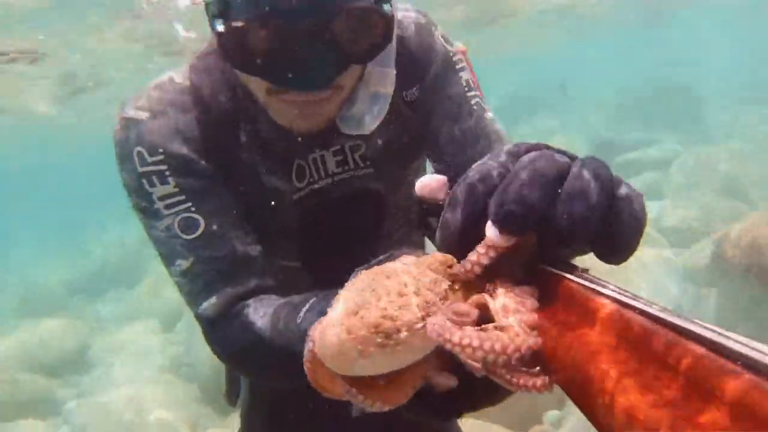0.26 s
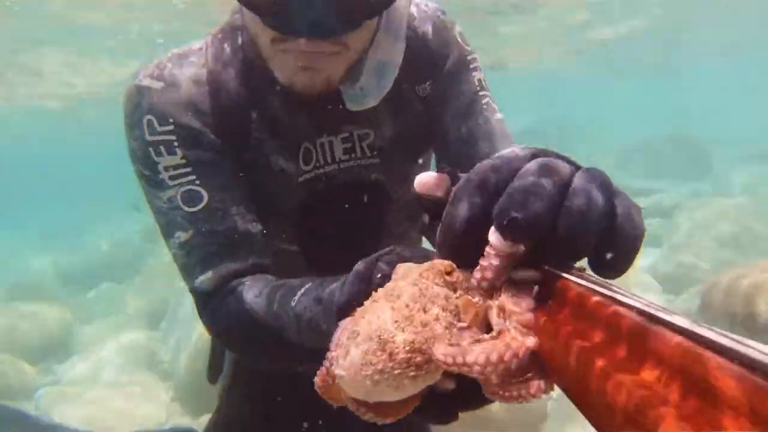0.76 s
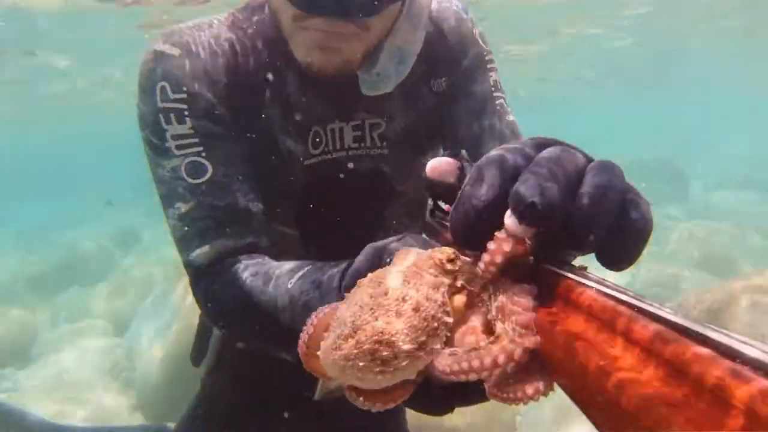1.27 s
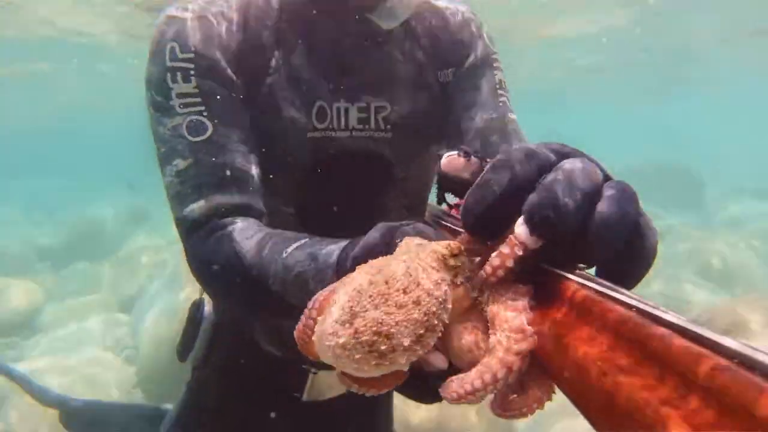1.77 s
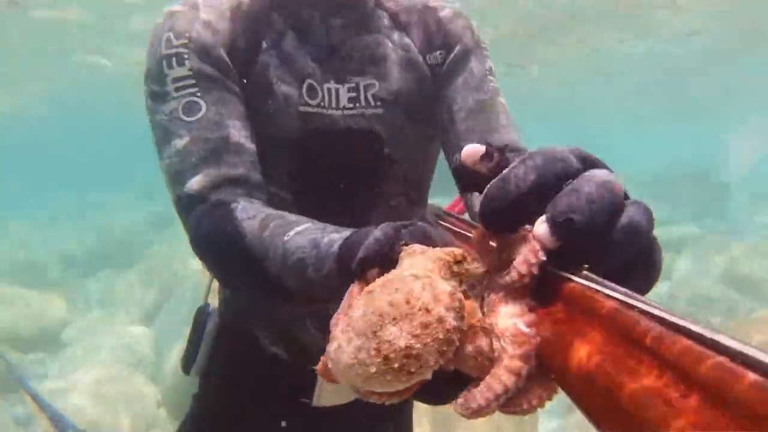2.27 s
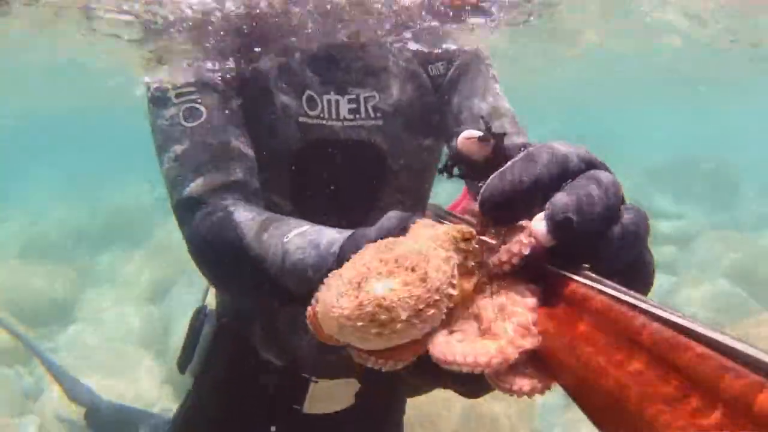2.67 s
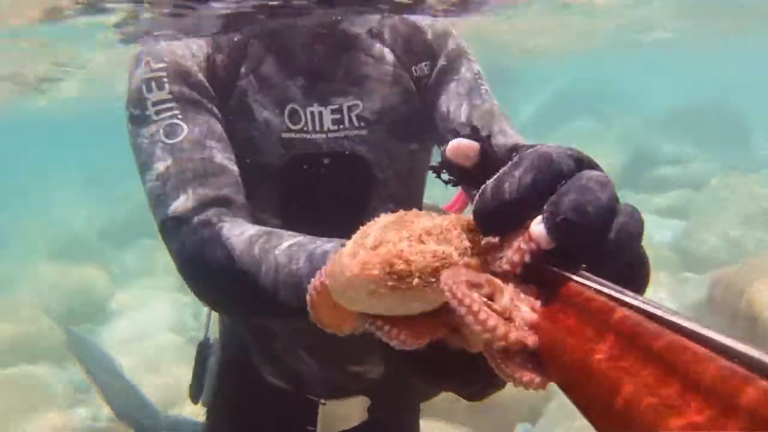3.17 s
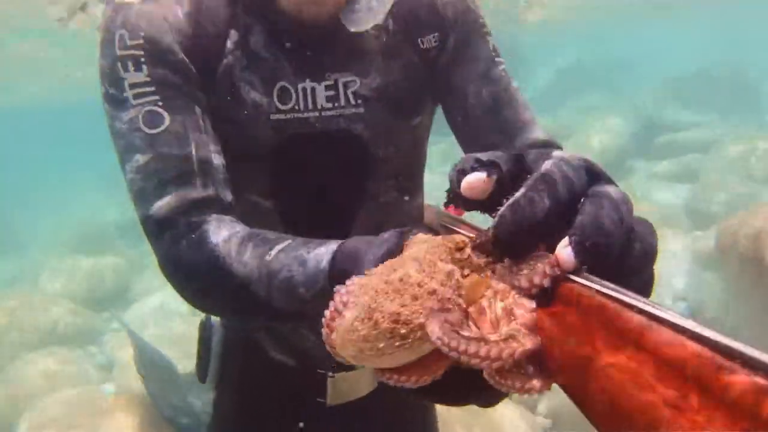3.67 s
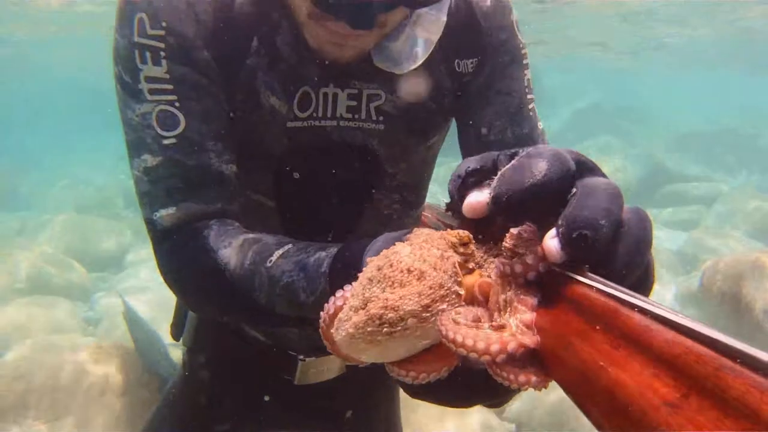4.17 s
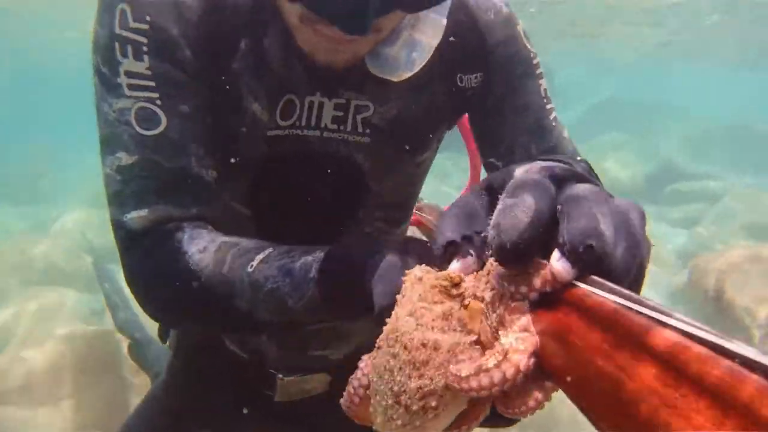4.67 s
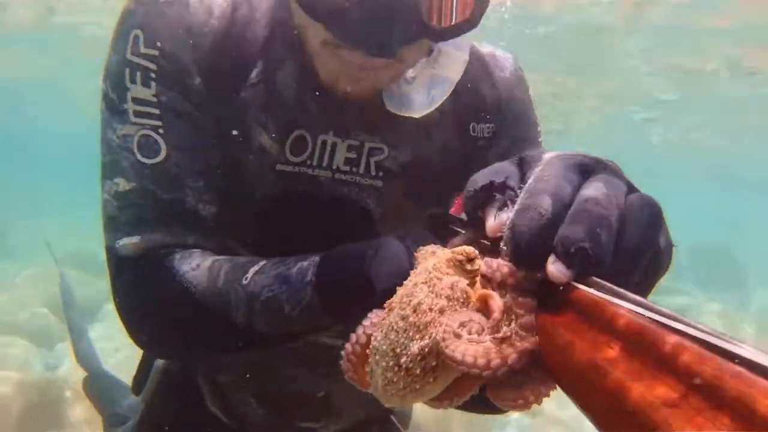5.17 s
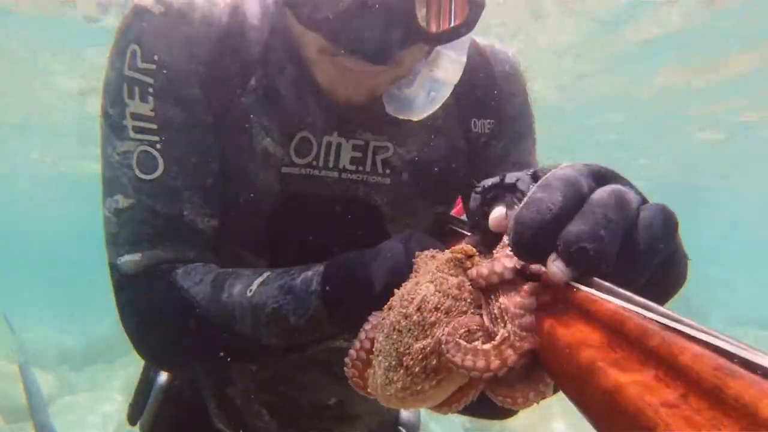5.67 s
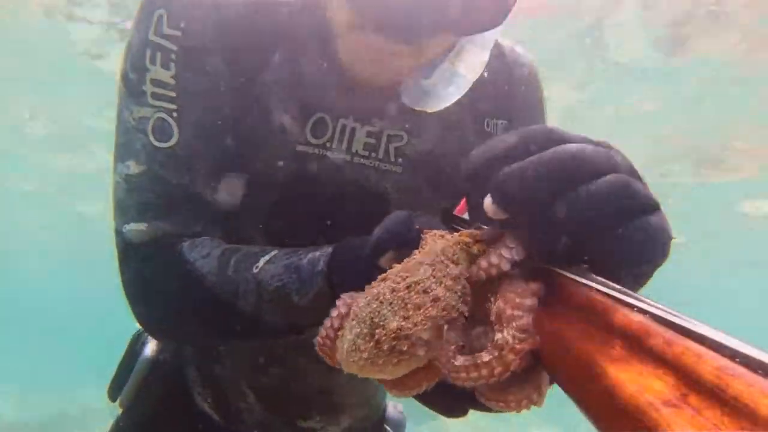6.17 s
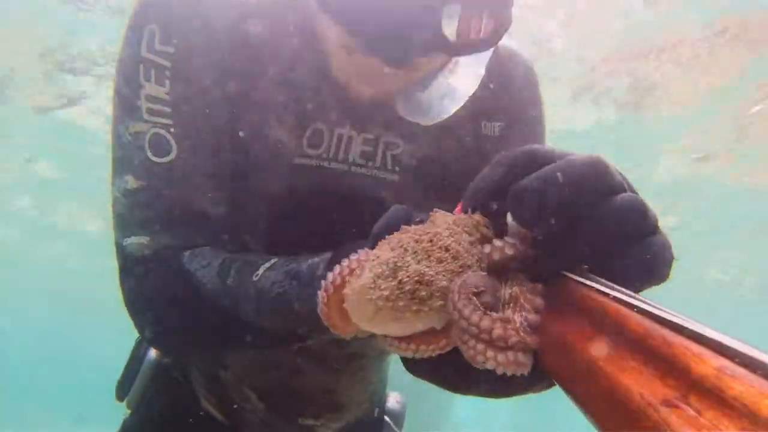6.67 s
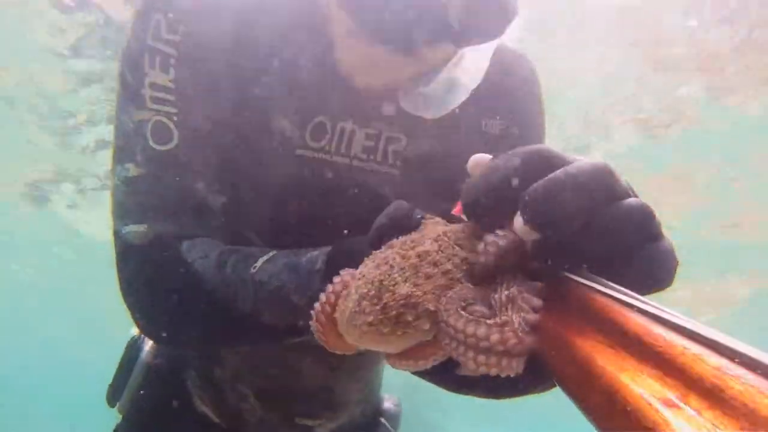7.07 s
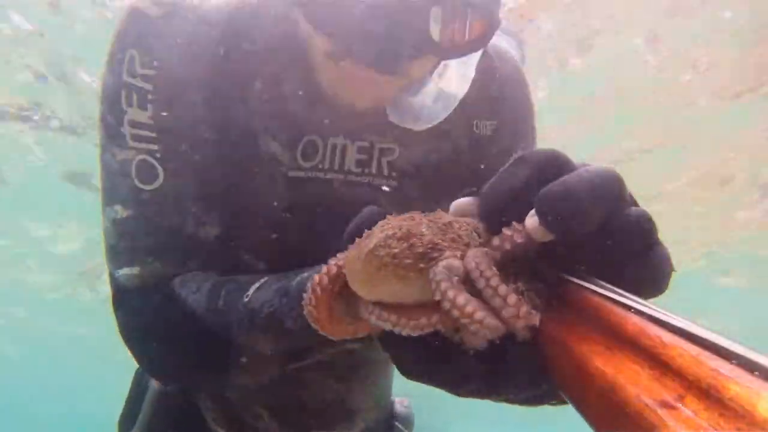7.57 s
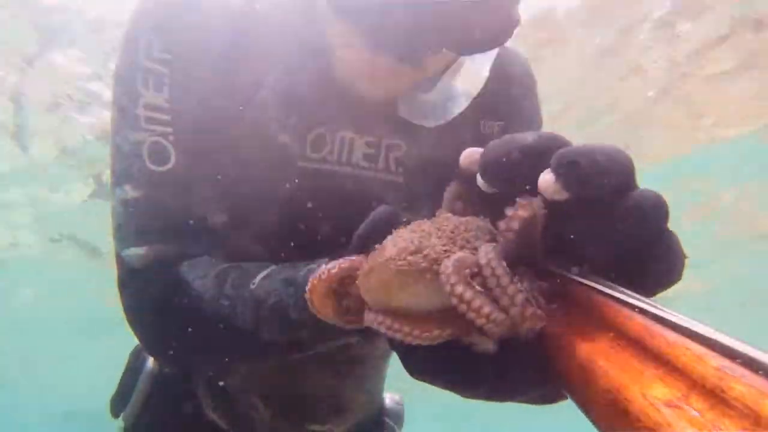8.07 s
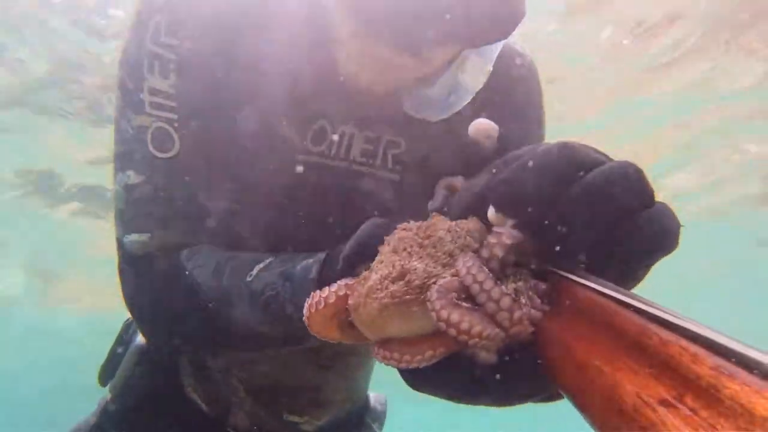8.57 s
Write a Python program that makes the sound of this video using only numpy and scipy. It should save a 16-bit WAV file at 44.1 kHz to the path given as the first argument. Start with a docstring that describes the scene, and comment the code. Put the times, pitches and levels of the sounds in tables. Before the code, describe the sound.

A diver with gloved hands holds an octopus and a wooden speargun underwater. The sealed camera mounted on the gun picks up close, hollow knocks, sharp clicks and short rubs, sparse at first, then denser and loudest around the middle, easing later. Beneath lie soft microphone hiss, faint low slosh and occasional tiny bubble ticks. Centred, dry and boxy.

```python
"""Speargun handled under water

A camera in a sealed housing sits on a wooden speargun that a diver handles. Knocks, snaps and rubs
drive decaying sine modes: the housing rings near 550 Hz, the barrel thuds, the mount sways low.
Coloured noise makes the slosh and the soft microphone hiss; bubbles tick as short rising sines."""
import sys
import numpy as np
from scipy import signal
from scipy.fft import rfft, irfft, next_fast_len
from scipy.io import wavfile
from scipy.ndimage import map_coordinates

SR = 44100
rng = np.random.default_rng(int(sys.argv[2]) if len(sys.argv) > 2 else 0)


def bounce(signal):
    """Save signal as a 16-bit WAV file at the path given by the first command-line argument."""
    frames = np.transpose(np.atleast_2d(signal))
    limited = np.clip(frames, -1, 1)
    pcm = np.round(limited * 32767).astype(np.int16)
    wavfile.write(sys.argv[1], SR, pcm)


N = 389844


def amp(db):
    """Decibels to gain."""
    return 10 ** (np.asarray(db) / 20)


def unit(x):
    """Scaled to rms 1."""
    return x / np.sqrt(np.mean(x ** 2) + 1e-20)


def along(points, at):
    """Straight lines through (place, value) points."""
    return np.interp(at, *np.transpose(points))


def add(track, start_s, sound):
    """Mixes a sound in at a time."""
    part = track[max(round(start_s * SR), 0):][:len(sound)]
    part += sound[:len(part)]


def filtered(x, response):
    """x with its spectrum multiplied by a response of frequency."""
    size = next_fast_len(N + 8192)
    spectrum = rfft(x, size) * response(np.fft.rfftfreq(size, 1 / SR))
    return irfft(spectrum, size)[..., :N]


def ringing(modes, scatter_db=0, detune=0, size=SR // 5):
    """Answer of modes to one tap: decaying sines that swell over a cycle, level and pitch scattered."""
    t = np.arange(size) / SR
    hz, db, t60_s = np.transpose(modes)[:, :, None]
    level, pitch = rng.standard_normal((2, len(modes), 1))
    hz = hz * (1 + detune * pitch)
    swell = (1 - np.exp(-2.5 * hz * t)) ** 2
    decay = amp(db + scatter_db * level - 60 * t / t60_s)
    return np.sum(decay * swell * np.sin(2 * np.pi * hz * t), axis=0)


def driven(force, modes):
    """A force played through modes, rms 1."""
    return unit(signal.fftconvolve(force, ringing(modes, size=SR // 2))[:N])


def gravel(rate_hz, spread_db):
    """Sparse random slips of uneven size and either sign."""
    hits = rng.random(N) < rate_hz / SR
    signs = rng.choice([-1, 1], N)
    return hits * signs * amp(spread_db * rng.standard_normal(N))


def clumps(rate_hz, depth_db):
    """Smooth random gain through knots at a given rate, swells capped."""
    knots = np.minimum(rng.standard_normal(int(N * rate_hz / SR) + 4), 1.6)
    return amp(depth_db * map_coordinates(knots, [np.arange(N) * rate_hz / SR]))


# microphone noise colour: f/Hz, relative density/dB
HISS_COLOUR = [(20, 5), (300, 4), (1000, 6), (2500, 3), (5000, 0), (14500, -3), (16000, -1)]


def hiss(level_db, side_db):
    """Coloured noise: a shared microphone hiss heard in the centre, and a faint opposite-signed noise that
    makes the two channels differ."""
    points = [(np.log(hz), db) for hz, db in HISS_COLOUR]

    def colour(hz):
        return amp(along(points, np.log(hz + 1)))

    shared, side = amp(level_db) * unit(filtered(rng.standard_normal((2, N)), colour))
    return shared + amp(side_db) * np.outer([1, -1], side)  # channels differ by a faint opposite-signed noise


# water moving round the housing: f/Hz, relative density/dB
SLOSH_COLOUR = [(12, -13.5), (28, 0.5), (60, -6), (100, -13), (200, -46)]
SLOSH_RMS_DB = -67.5


def slosh():
    """Moving water: low-coloured noise, broken up by a random gain."""
    stir = rng.standard_normal(N) * clumps(rate_hz=15, depth_db=4.0)
    return amp(SLOSH_RMS_DB) * unit(filtered(stir, lambda hz: amp(along(SLOSH_COLOUR, hz))))


# modes of the camera on its mount: f/Hz, level/dB, t60/s
MOUNT_MODES = [(44.36, 1, 0.3), (66, 3, 0.1), (110, -10.5, 0.1)]
# jolts that set the mount swinging: t/s, drive level/dB
JOLTS = [(0.301, -49), (0.615, -55), (0.689, -56), (0.92, -46), (1.322, -45), (1.41, -48), (1.68, -41),
         (1.81, -52), (1.974, -44.5), (2.05, -54), (2.309, -54), (2.447, -46), (2.574, -44), (2.781, -42),
         (2.933, -39), (3.028, -32), (3.226, -36.5), (3.483, -44), (3.703, -35), (3.796, -29.5),
         (4.081, -46.5), (4.228, -37.5), (4.631, -37), (4.772, -47), (5.128, -33.5), (5.232, -28),
         (5.307, -38.5), (5.396, -46), (5.505, -30), (5.63, -44), (5.746, -44), (5.901, -42.5), (6.03, -44),
         (6.342, -46), (6.397, -41), (6.511, -43), (6.825, -50), (7.009, -49), (7.259, -40), (7.643, -44.5),
         (7.71, -45), (7.829, -36), (7.961, -39), (8.06, -44), (8.499, -39.5), (8.588, -31.5)]


def sway():
    """The camera rocks on its mount: jolts start slow swings over a faint stirring by the water."""
    stir = rng.standard_normal(N) * clumps(rate_hz=3.02, depth_db=4.0)
    out = amp(-70.0) * driven(stir, MOUNT_MODES[:1])
    for s, db in JOLTS:
        swing = ringing(MOUNT_MODES, scatter_db=3.0, detune=0.053, size=SR // 2)
        add(out, s + 0.0024, rng.choice([-1, 1]) * amp(db) * swing)
    return out


# modes of the air in the housing: f/Hz, relative level/dB, t60/s
AIR_MODES = [(551, 9, 0.098), (519.4, -12.5, 0.25)]
# modes of the barrel: f/Hz, relative level/dB, t60/s
BARREL_MODES = [(144, -12, 0.086), (281, 1.5, 0.019), (348, -3.5, 0.082), (392, -2, 0.059)]
# modes of the housing shell: f/Hz, relative level/dB, t60/s
SHELL_MODES = [(847, -9.5, 0.11), (952, 1.5, 0.039), (1178, 19.5, 0.011), (1418, 7, 0.034),
               (1622, 9, 0.025), (1795, -5, 0.05), (2080, -19, 0.011)]
# fidgeting that grows, then eases: t/s, gain/dB
FIDGET_GAIN = [(0.0, -73.5), (0.37, -69.5), (5.59, -58), (8.84, -63.5)]


def fidget():
    """Faint touches in clumps keep the housing humming; sparser, more uneven ones tap the shell."""
    low_air = [(hz * 0.95, db, t60_s) for hz, db, t60_s in AIR_MODES]  # a firmer grip lowers the ring
    slips = gravel(rate_hz=96, spread_db=1.5) * clumps(rate_hz=27, depth_db=6)
    taps = gravel(rate_hz=51, spread_db=9.0) * clumps(rate_hz=3.7, depth_db=3.5)
    hum = driven(slips, AIR_MODES) * clumps(rate_hz=12, depth_db=0.5)
    hum += amp(-3) * driven(slips[::-1], low_air)  # reversed: touches at other times
    hum += amp(-6.5) * driven(slips, BARREL_MODES)
    hum += amp(-11.5) * driven(slips, SHELL_MODES)
    tapped = amp(-18.5) * driven(taps, AIR_MODES) + amp(-10.0) * driven(taps, SHELL_MODES)
    return amp(along(FIDGET_GAIN, np.arange(N) / SR)) * (hum + tapped)


# modes of the housing's small parts: f/Hz, relative level/dB, t60/s
PARTS_MODES = [(1950, -7, 0.013), (2415, -8, 0.016), (2794, -9, 0.022), (3173, -2.5, 0.012),
               (3465, -4.5, 0.0096), (4170, -12, 0.013), (5640, -21.5, 0.013)]
# knocks on the gun: t/s, air ring peak/dB, weight = barrel re ring/dB, hardness = shell re ring/dB
KNOCKS = [(0.119, -47, -3, -7.5), (0.197, -41.5, -36, -7), (0.28, -42, -4.5, -8), (0.3, -56.5, 5, 13),
          (0.345, -46, -24, 6.5), (0.542, -43, -30, -2.5), (0.645, -52.5, 8.5, 0), (0.69, -47.5, 1.5, -4),
          (0.766, -41.5, -33, -4.5), (0.811, -54.5, -23, 5), (0.916, -26.5, -10.5, -13),
          (0.931, -33.5, -3, -5.5), (0.962, -44.5, -21, -4.5), (1.048, -33, -30, -4),
          (1.111, -44.5, -18, -2), (1.186, -34, -25, -3), (1.243, -45.5, -2, -7.5), (1.288, -47, -5.5, 0.5),
          (1.314, -36.5, -7, -4), (1.433, -48, -12, -9.5), (1.471, -37.5, -19, -11), (1.517, -39, -6, 4.5),
          (1.786, -47.5, -23, -2.5), (2.009, -30, -13, -13), (2.191, -40.5, -8.5, -28),
          (2.458, -31.5, -10.5, -5), (2.55, -42, -4, -2.5), (2.578, -41, -8.5, -28),
          (2.679, -45, -26, -1.5), (2.72, -32, -11, -9.5), (2.775, -41, -2.5, -32),
          (2.826, -38.5, -7, -3.5), (2.867, -26, -31, 1.5), (2.975, -38.5, -2, -4),
          (3.035, -35.5, -9, -4.5), (3.081, -50.5, 2, 4), (3.168, -46, -30, -2.5),
          (3.235, -21, -14.5, -1.5), (3.248, -32, 2.5, -11), (3.257, -21.5, -34, -11.5),
          (3.329, -45, -1, 0), (3.412, -36, -9, -5), (3.481, -41.5, -8, 1.5), (3.711, -46, 0, 3),
          (3.762, -37.5, 3.5, 3.5), (3.801, -29, 3.5, 0), (3.8115, -19, -43, -21), (3.829, -23, -5, -14.5),
          (3.897, -40.5, -28, -11), (3.923, -40.5, -5, -13), (4.076, -39, -2.5, -3.5),
          (4.154, -27.5, -3.5, -8.5), (4.187, -29, -19, -10.5), (4.196, -38, -6, -2.5),
          (4.234, -32, -6.5, -15), (4.284, -36, -9, -10.5), (4.367, -23.5, -2.5, -0.5), (4.419, -47, 10, 5),
          (4.552, -40.5, -7, 2.5), (4.649, -31.5, -2.5, -22), (4.66, -31.5, -31, -1), (4.698, -51, 2, 6),
          (4.73, -42.5, -3.5, 0), (4.789, -47, 2.5, -11.5), (5.031, -38, -31, -3), (5.124, -36.5, -23, 1),
          (5.15, -42, -26, -6.5), (5.185, -33, -30, 1.5), (5.237, -21.5, -3, -4.5), (5.247, -12, -33, -4),
          (5.2565, -21, -25, -7.5), (5.289, -29, 1.5, -5), (5.306, -36.5, -3, -2.5), (5.3501, -46, -1, 9),
          (5.401, -38, -1.5, -6), (5.515, -27.5, -1.5, -5), (5.522, -19, -38, -8), (5.716, -40, 1.5, 3.5),
          (5.766, -33, -1.5, -6), (5.838, -36, -3, 3), (5.913, -32, -6, -10), (6.028, -44, -5, -0.5),
          (6.311, -31, -4, -3), (6.329, -38.5, -27, 0.5), (6.341, -48, 0, 2), (6.412, -29, -4.5, -3.5),
          (6.468, -34, -16, -7.5), (6.518, -35.5, -2.5, -9), (6.628, -36.5, -1, -5.5), (6.659, -51, 6, 7),
          (6.679, -33.5, -1.5, -15), (6.779, -53.5, -20, 9), (6.808, -46, -8, 2),
          (6.836, -33.5, -14.5, -16), (6.875, -45.5, -1.5, -13), (6.953, -58.5, 7, 8.5),
          (7.025, -57, 8.5, 11), (7.068, -63, -10, 12), (7.161, -65, 5, 9), (7.209, -53, -4, 4.5),
          (7.246, -40, 0.5, 0), (7.268, -34.5, -11, -10), (7.385, -37.5, -7.5, -7),
          (7.647, -36.5, -4.5, -7), (7.713, -41, -5.5, -4.5), (7.822, -38.5, -20, -8.5),
          (7.838, -26, -10, -13), (7.846, -31.5, -5.5, -2), (7.866, -35.5, -3, -3.5),
          (7.937, -30, -12.5, -37), (7.996, -30.5, -7.5, -8.5), (8.022, -42, 1, 0.5),
          (8.464, -50.5, 2, 8.5), (8.49, -34.5, -5.5, -10), (8.594, -28.5, -5, 0.5),
          (8.643, -41, -12, -7.5)]
MODE_SCATTER_DB = 3.5  # spread of each mode's strength from blow to blow
PARTS_DB, PARTS_DB_PER_HARDNESS_DB = -16, 0.91  # harder blows click the small parts more
RISE_S, RISE_DB_PER_SOFTNESS_DB, SLOWEST_RISE_S = 0.0006, 1.3, 0.00301  # softer blows swell slower
CHATTER_DECAY_S, RATTLE_DECAY_S = 0.006, 0.012  # to 1/e


def knocks():
    """A first blow and short chatter shake air, barrel, shell and small parts; the last two rattle on."""
    out, t = np.zeros(N), np.arange(SR // 16) / SR
    for s, ring_db, weight_db, hardness_db in KNOCKS:
        chatter = 0.048 * rng.standard_normal(len(t)) ** 3 * np.exp(-t / CHATTER_DECAY_S)
        chatter[0] = 1  # the first blow
        contacts = (rng.random(len(t)) < 600 / SR) * rng.standard_normal(len(t))
        rattle = chatter + 0.5 * contacts * np.exp(-t / RATTLE_DECAY_S)

        bodies = np.array([ringing(modes, scatter_db=MODE_SCATTER_DB, detune=0.02)
                           for modes in (AIR_MODES, BARREL_MODES, SHELL_MODES, PARTS_MODES)])
        bodies = signal.fftconvolve(bodies, [chatter, chatter, rattle, rattle], axes=1)
        rise_s = min(RISE_S * amp(-RISE_DB_PER_SOFTNESS_DB * hardness_db), SLOWEST_RISE_S)
        bodies *= 1 - np.exp(-(np.arange(bodies.shape[1]) / SR / rise_s) ** 2)
        bodies /= np.abs(bodies).max(axis=1, keepdims=True)

        parts_db = PARTS_DB + PARTS_DB_PER_HARDNESS_DB * hardness_db
        gains = amp(ring_db + np.array([0, weight_db, hardness_db, parts_db]))
        add(out, s - 0.6 * rise_s, gains @ bodies)
    return out


# low thuds of the barrel, and one deeper boom of the jolted mount: t/s, level/dB, f/Hz
THUDS = [(0.121, -60, 194), (0.771, -55, 198), (1.47, -48, 188), (1.519, -48, 189), (3.028, -37.5, 82.4),
         (4.367, -36.5, 192), (5.298, -45, 199), (5.842, -48.5, 193), (6.5, -49, 199), (7.89, -50, 196)]
THUD_CYCLES = 34  # per 60 dB of decay


def thuds():
    """Low thuds of the barrel and one deeper boom of the jolted mount: one decaying mode each."""
    out = np.zeros(N)
    for s, db, hz in THUDS:
        add(out, s, ringing([(hz, db, THUD_CYCLES / hz)], size=SR // 2))
    return out


# rubbing strokes: start t/s, end t/s, drive level/dB, grit/dB
RUBS = [(0.385, 0.52, -61, -3.5), (0.605, 0.754, -57, -4.5), (0.922, 0.969, -59, -3),
        (1.447, 1.499, -43, -15), (1.773, 1.806, -49.5, -3), (1.925, 2.04, -54, -5.5),
        (2.172, 2.268, -47, -17), (2.254, 2.44, -54, -6.5), (3.24, 3.272, -49, 1.5), (3.65, 3.733, -61, -6),
        (3.736, 3.786, -38, -11.5), (4.124, 4.18, -45, -4), (4.577, 4.663, -59, 0.5),
        (4.818, 4.904, -52.5, 0.5), (5.105, 5.124, -36, -27), (5.285, 5.295, -56, 6),
        (5.4, 5.425, -57, 2.5), (5.518, 5.547, -56, -3), (5.594, 5.703, -60.5, 0),
        (5.774, 5.808, -50, -4.5), (6.217, 6.317, -53.5, 4.5), (6.515, 6.547, -44.5, -6),
        (6.632, 6.687, -48, -5), (7.626, 7.691, -46.5, -6), (7.684, 7.747, -55, -1.5),
        (7.888, 7.902, -43, -2), (8.452, 8.594, -46, -12.5)]
# what squeaks under a gritty stroke: f/Hz, relative level/dB, t60/s
SQUEAK_MODES = [(1680, 4, 0.04), (2050, 8, 0.07), (3260, 2, 0.03), (3610, 2, 0.04), (4330, -1, 0.03),
                (5170, -8, 0.02)]
SQUEAK_DB_PER_GRIT_DB, SQUEAK_GRIT_CAP_DB = 2.2, 6


def rubbing():
    """Gloves slip along the barrel: dense slips; grit favours the upper modes and most of all the squeak."""
    t, soft, gritty, squeaky = np.arange(N) / SR, 0, 0, 0
    for start_s, end_s, db, grit_db in RUBS:
        progress = np.clip((t - start_s) / (end_s - start_s), 0, 1)
        stroke = amp(db) * np.sin(np.pi * progress) ** 0.53
        soft = soft + stroke
        gritty = gritty + amp(grit_db) * stroke
        squeak_db = SQUEAK_DB_PER_GRIT_DB * min(grit_db, SQUEAK_GRIT_CAP_DB)
        squeaky = squeaky + amp(squeak_db) * stroke

    slips = unit(gravel(rate_hz=1600, spread_db=4.5) * clumps(rate_hz=81, depth_db=2.0))
    shares = [(soft, AIR_MODES, -2.5), (soft, BARREL_MODES, -8), (gritty, SHELL_MODES, -5),
              (gritty, SHELL_MODES[:2], -7), (squeaky, SQUEAK_MODES, -10)]
    out = np.zeros(N)
    for force, modes, db in shares:
        answer = ringing(modes)
        answer /= np.linalg.norm(answer)
        out += amp(db) * signal.fftconvolve(force * slips, answer)[:N]
    return out


# dry snaps of hard parts touching: t/s, noise level/dB before make-up, ping peak/dB
SNAPS = [(1.049, -64, -44), (1.1868, -55, -48), (1.5165, -57, -46), (2.869, -47, -28.5), (3.802, -55, -61),
         (4.186, -53, -53), (4.196, -64, -39), (4.368, -68, -35), (4.419, -62, -39), (4.698, -63, -47.5),
         (5.0317, -56, -41), (5.123, -61, -43), (5.151, -59, -44), (5.1856, -51, -29.5), (5.193, -70, -36),
         (5.248, -50, -46), (5.26, -43, -33.5), (5.7553, -55, -37.5), (5.84, -63, -44.5), (6.262, -63, -43),
         (6.304, -54, -38), (6.327, -64, -41), (7.386, -57, -57), (8.022, -60, -41.5), (8.592, -56, -63)]
COLOUR_MAKEUP_DB = 17.5  # offsets what the colour filter takes


def snaps():
    """Hard parts touch: milliseconds of bright noise, falling to the treble, and a small-parts ping."""
    bursts, pings, t = np.zeros(N), np.zeros(N), np.arange(600) / SR
    for s, db, ping_db in SNAPS:
        decay = amp(db + COLOUR_MAKEUP_DB - 60 * t / 0.016)
        add(bursts, s, decay * rng.standard_normal(len(t)))
        ping = ringing(PARTS_MODES, scatter_db=MODE_SCATTER_DB, detune=0.031, size=SR // 20)
        add(pings, s, amp(ping_db) * ping / np.abs(ping).max())
    return pings + filtered(bursts, lambda hz: (hz / 4000) ** 2 / (1 + (hz / 4000) ** 4.2))


# single bubbles: t/s, level/dB, starting f/Hz
TICKS = [(1.187, -41.5, 3720), (1.519, -28, 1597), (2.1061, -48, 8940), (2.38, -43, 8860),
         (2.4497, -48, 4260), (2.749, -45, 8700), (2.777, -44.5, 8600), (3.928, -49, 8250),
         (4.098, -48, 4870), (4.098, -47, 3950), (4.342, -53, 3760), (5.352, -36, 1590),
         (7.8055, -44, 7800), (8.2896, -49, 7640)]
# clouds of tiny bubbles: start t/s, end t/s, loudest level/dB
CLOUDS = [(2.35, 2.5, -51), (4.1, 4.15, -50), (6.85, 6.93, -56)]
BUBBLE_CYCLES = 77  # per 60 dB of decay, at the starting pitch


def ticks():
    """Bubbles, alone or in clouds: decaying sines rising a little in pitch; higher ones are shorter."""
    out, t = np.zeros(N), np.arange(SR // 15) / SR
    bubbles = list(TICKS)
    for start_s, end_s, db in CLOUDS:
        length_s = end_s - start_s
        for when, softness, octave in rng.random((int(length_s * 70), 3)):
            bubbles.append((start_s + length_s * when, db - 8 * softness, 4500 * 2 ** octave))
    for s, db, hz in bubbles:
        phase = 2 * np.pi * hz * t * (1 + 1.3 * t)
        decay = amp(db - 60 * t * hz / BUBBLE_CYCLES)
        add(out, s, decay * np.sin(phase) * (1 - np.exp(-t / 0.00028)))
    return out


def scene():
    """Everything arrives in the centre, except a faint noise that differs between the two channels."""
    handling = knocks() + thuds() + snaps() + rubbing() + fidget() + sway()
    water = slosh() + ticks()
    return handling + water + hiss(level_db=-62.5, side_db=-33.0)


TOP_HZ = 15350


def record(dry):
    """The camera keeps nothing above its band limit."""
    return filtered(dry, lambda hz: hz < TOP_HZ)


dry = scene()
out = record(dry)
bounce(out)
```